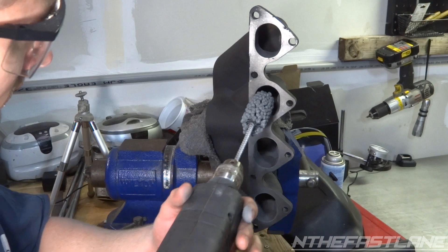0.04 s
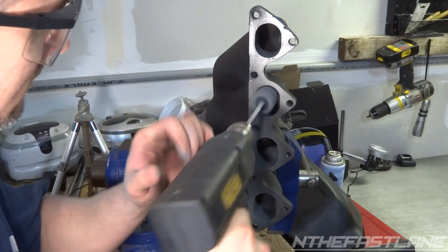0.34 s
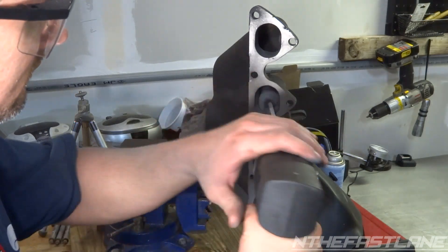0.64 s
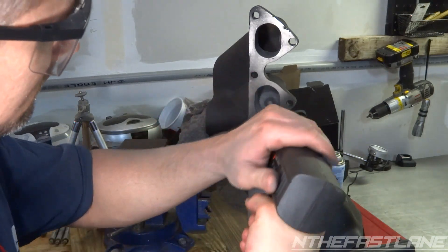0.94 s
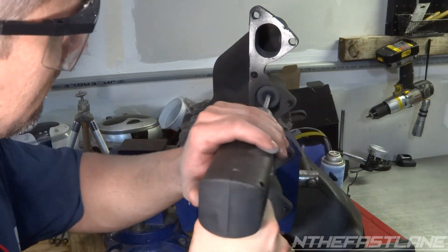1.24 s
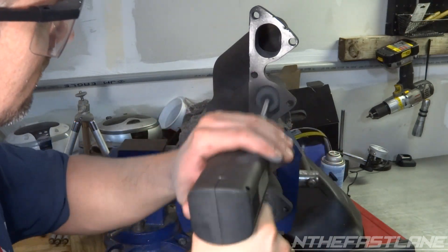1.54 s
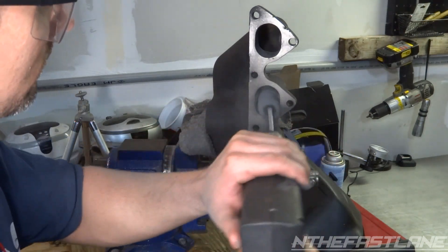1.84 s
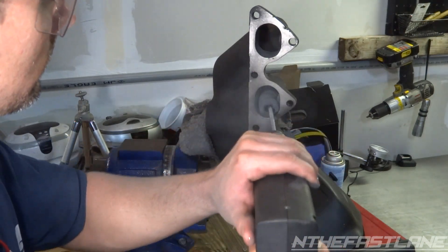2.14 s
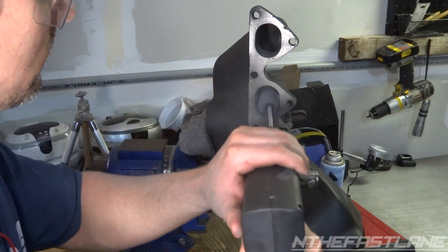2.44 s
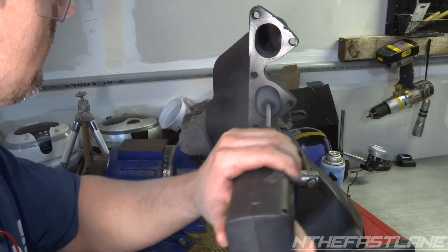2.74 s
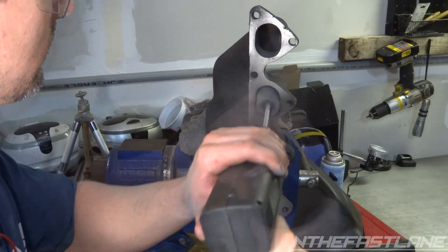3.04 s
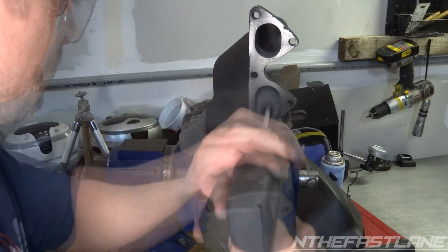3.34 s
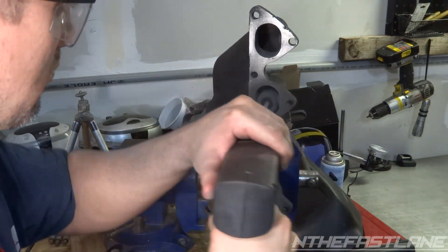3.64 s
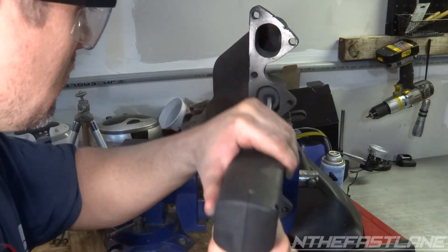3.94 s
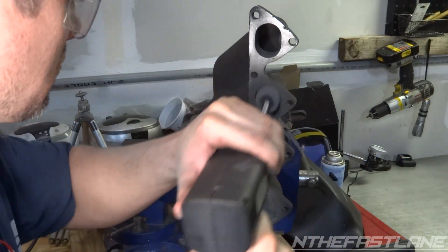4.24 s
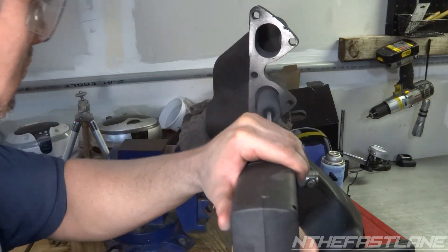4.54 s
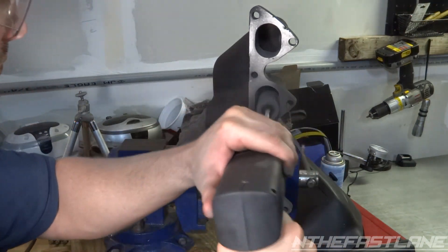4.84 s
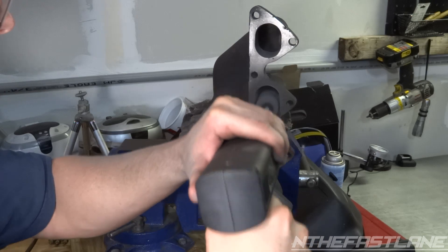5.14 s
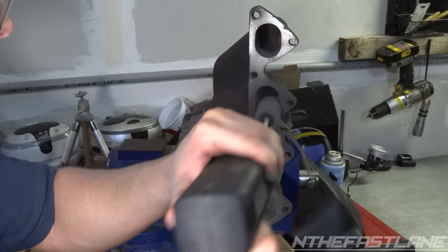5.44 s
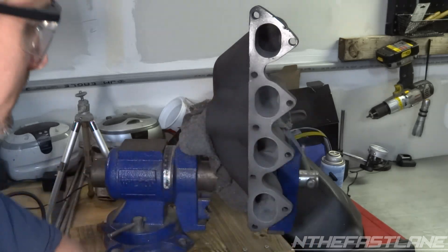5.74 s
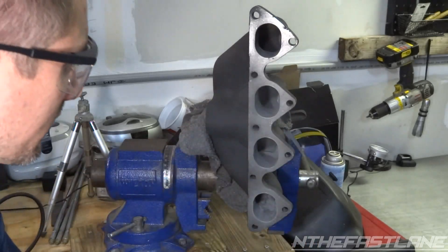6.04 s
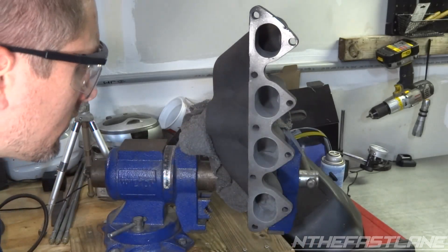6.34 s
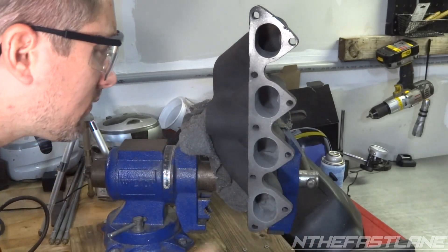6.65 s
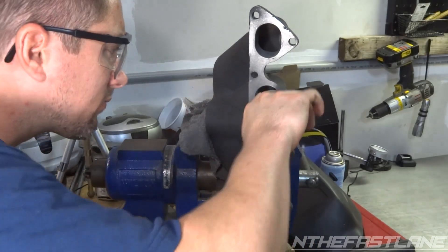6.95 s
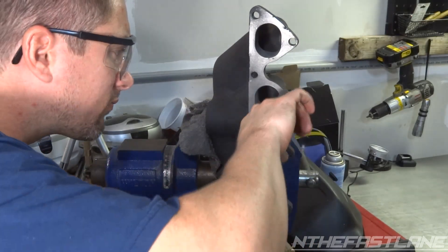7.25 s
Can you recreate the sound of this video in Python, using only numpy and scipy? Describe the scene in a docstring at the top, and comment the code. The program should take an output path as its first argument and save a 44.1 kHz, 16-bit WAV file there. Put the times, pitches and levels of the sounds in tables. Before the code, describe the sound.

Close by in a workshop, a beaded hone ticks lightly against a cast metal part. An electric drill starts with a clack of gears and rises to a high whine, wavering and sagging under load over gritty scrubbing and a fizzing hiss. After about five seconds the hone comes out with a brief whoosh, and the drill rattles as it coasts down.

```python
"""An electric drill spins a beaded abrasive hone in the port of a cast metal manifold, close by in a workshop.
The beads tick on the casting, the trigger is pulled and the gears clack. The armature slots whine,
sagging in pitch under load, over scrubbing beads, growling gears and fizzing brushes.
The hone is drawn out and whirls in the air while the slack drive rattles and coasts down."""
import sys
import numpy as np
from scipy import signal
from scipy.fft import rfft, irfft
from scipy.io import wavfile

SR = 44100
rng = np.random.default_rng(int(sys.argv[2]) if len(sys.argv) > 2 else 0)


def file_out(sig):
    """Save sig as 16-bit WAV at sys.argv[1]."""
    # one column per channel
    cols = np.atleast_2d(sig).T
    # limit, then scale
    lim = np.clip(cols, -1, 1)
    pcm = np.round(lim * 32767).astype(np.int16)
    wavfile.write(sys.argv[1], SR, pcm)


N = 330115
TIME = np.arange(N) / SR
TRIGGER_S, RELEASE_S = 0.248, 5.64
PLANET_ORDER = 18 / 13  # planet gear rate / shaft rate


def gain_of(db):
    """Decibels to amplitude."""
    return 10 ** (np.asarray(db) / 20)


def unit_rms(x):
    """Scale to rms 1."""
    return x / np.sqrt(np.mean(x ** 2) + 1e-20)


def curve(rows):
    """(time, value) rows, interpolated per sample."""
    return np.interp(TIME, *np.transpose(rows))


def bell(x, centre, sigma):
    """Gaussian of height 1."""
    return np.exp(-.5 * ((x - centre) / sigma) ** 2)


def envelope(start_s, attack_s, hold_until_s, db, fall_db, bend):
    """Attack, hold, release; fall_db is lost in the first second of release."""
    attack = np.clip((TIME - start_s) / attack_s, 0, 1)
    return attack * gain_of(db - fall_db * np.maximum(TIME - hold_until_s, 0) ** bend)


def filtered(x, points):
    """Apply (Hz, dB) points; roll off below the first."""
    f, db = np.transpose(points)
    hz = np.fft.rfftfreq(N, 1 / SR)
    response = gain_of(np.interp(np.log(hz + 1), np.log(f), db)) * np.minimum(hz / f[0], 1) ** 2
    return irfft(rfft(x) * response, N)


def coloured(x, points):
    """Filter, then scale to rms 1."""
    return unit_rms(filtered(x, points))


def bandpass(x, low_hz, high_hz):
    """Butterworth band-pass."""
    return signal.sosfilt(signal.butter(2, [low_hz, high_hz], "band", fs=SR, output="sos"), x)


def ring(x, modes):
    """Parallel resonators: (Hz, width Hz, power dB)."""
    out = np.zeros(N)
    for hz, width_hz, db in modes:
        r = np.exp(-np.pi * abs(width_hz) / SR)
        pole = r * np.exp(2j * np.pi * hz / SR)
        out += gain_of(db) * np.sqrt(2 * (1 - r * r)) * signal.lfilter([1], [1, -pole], x).real
    return out


def wander(hz):
    """Low-passed noise, rms 1."""
    f = np.fft.rfftfreq(N, 1 / SR)
    return unit_rms(irfft(rfft(rng.standard_normal(N)) / (1 + (f / hz) ** 4), N))


def smear(hz):
    """Complex wander: blurs amplitude and phase."""
    return wander(hz) + 1j * wander(hz)


def grit(per_s, spread_db, share):
    """Tiny uneven impacts over white noise; share is their part of the power."""
    size = gain_of(spread_db * np.minimum(rng.exponential(1, N), 4)) * rng.choice([-1, 1], N)
    impacts = unit_rms(size * (rng.random(N) < per_s / SR))
    return np.sqrt(share) * impacts + np.sqrt(1 - share) * rng.standard_normal(N)


def running():
    """Near 1 with the trigger held and the hone in the bore."""
    return np.interp(TIME, [TRIGGER_S, .28, 5.52, 5.66, 5.95], [0.01, 0.98, 0.95, 0.73, 0.0021])


def room_rumble(trim_db=4, sway_db=2.0):
    """Rumble of the room and the shaking bench."""
    # (time [s], level [dB])
    levels = [(0.2, -47), (.6, -59), (1.9, -55.5), (2.2, -47.5), (2.45, -50), (2.7, -56.5), (6, -56.5),
              (7.1, -52)]
    # (frequency [Hz], density [dB])
    spectrum = [(20, -20), (40, -12), (56, -9), (75, -7.5), (115, 0.5), (155, 5.5), (220, -3.5), (400, -14),
                (1000, -20), (4000, -19), (16000, -16.5)]
    gain = gain_of(trim_db + curve(levels) + sway_db * wander(hz=6.4))
    return gain * coloured(rng.standard_normal(N), spectrum)


def strikes(hits, modes, crack, snap, snap_s=0.0016):
    """Each contact is a snap and a short scrape that ring the metal."""
    blows = np.zeros(N)
    for onset_s, db, t60_s in hits:
        age_s = np.maximum(TIME - onset_s, 0)
        decay = gain_of(db - 60 * age_s / t60_s) * (TIME >= onset_s)
        blows += decay * (1 + snap * np.exp(-age_s / snap_s))
    scrape = blows * rng.standard_normal(N)
    return ring(scrape, modes) + crack * np.diff(scrape, prepend=0)


def hone_ticks():
    """Hone and chuck strike metal."""
    # (time [s], relative level [dB], t60 [s])
    hits = [(.003, -30.5, .09), (.041, -30, .04), (0.051, -29, .04), (.069, -33, .06), (.108, -34, .04),
            (0.123, -24.5, 0.073), (0.156, -29, 0.048), (0.159, -22.5, 0.15), (0.194, -30, .2),
            (.211, -31, 0.21), (.232, -25, .08), (6.353, -20, 0.095)]
    # (frequency [Hz], width [Hz], level [dB])
    steel_modes = [(3700, 500, -26), (4800, 250, -11), (6800, 620, -11), (8900, 300, -9), (10530, 98, -2),
                   (12000, 3900, 3.5), (13800, 980, -11)]
    return gain_of(-12.5) * strikes(hits, steel_modes, crack=0.16, snap=0.7)


def gear_clacks():
    """Gear teeth take up their slack at the start."""
    # (time [s], relative level [dB], t60 [s])
    hits = [(.2495, -10.5, 0.034), (.259, -18, 0.033), (.268, -14, .025), (.277, -13, 0.12),
            (.292, -18.5, 0.17)]
    # (frequency [Hz], width [Hz], level [dB])
    gearbox_modes = [(1660, 220, -2), (2750, 430, -1.5), (3700, 280, 1), (6800, 320, -1),
                     (10500, 1800, -18)]
    return gain_of(-10) * strikes(hits, gearbox_modes, crack=0.1, snap=0.34)


def shudder(at_s=6.362, sigma_s=.015, lift_db=2):
    """Gain bump: the slack drive shudders once."""
    return gain_of(lift_db * bell(TIME, at_s, sigma_s))


def coast_ringing(uneven_db=2.0):
    """The loose drive keeps hollow and thin resonances sounding as it runs down."""
    # (frequency [Hz], width [Hz], level [dB])
    hollow_modes = [(606, 57, -5.5), (665, 33, 0), (730, 20, -3), (817, 30, -2)]
    thin_modes = [(6280, 58, -5), (6350, 160, -3)]
    hollow = coloured(ring(rng.standard_normal(N), hollow_modes), [(480, 1.5), (900, 0), (3000, -29)])
    chatter = grit(per_s=2300, spread_db=0.5, share=0.28)
    thin = coloured(ring(chatter, thin_modes), [(5000, 6), (7000, -4), (14000, -15)])
    hollow *= envelope(5.7, .17, 5.87, db=-32, fall_db=5.2, bend=2.5)
    thin *= envelope(5.7, .17, 5.87, db=-30.5, fall_db=7.3, bend=1.46)
    return (hollow + thin) * gain_of(uneven_db * wander(hz=30)) * shudder()


def coast_rattle(settle_s=(6.5, 6.63), settle_db=-4, dull_hz=11000):
    """The slack drive rattles, duller and softer once settled."""
    # (frequency [Hz], density [dB])
    spectrum = [(150, -13.5), (500, -5.5), (1750, 3.5), (3200, -3), (4000, 2.5), (4900, -5), (6400, -2.5),
                (7300, -4.5), (7800, -1), (8800, -4.5), (10300, -2.5), (14000, -7.5), (16000, -13)]
    clatter = coloured(grit(per_s=3000, spread_db=2.0, share=0.52), spectrum)
    dull = unit_rms(signal.sosfilt(signal.butter(1, dull_hz, fs=SR, output="sos"), clatter))
    settled = np.interp(TIME, settle_s, [0, 1])
    rattle = (1 - settled) * clatter + settled * gain_of(settle_db) * dull
    return envelope(5.5, .15, 6.08, db=-22.5, fall_db=7.9, bend=0.56) * shudder() * rattle


def bead_whoosh():
    """Out of the bore, the beads beat the air."""
    # (frequency [Hz], density [dB])
    spectrum = [(100, -38), (250, -20), (420, -1), (600, 0.5), (900, 1.5), (1200, 8.5), (1600, 1),
                (2200, 4), (2900, -13), (4200, 0.5), (8000, -3.5), (16000, -29)]
    air = coloured(rng.standard_normal(N), spectrum)
    return envelope(5.47, .13, 5.87, db=-21.5, fall_db=39, bend=0.69) * air


def body_ring(strain_db):
    """Drill body and chuck ring at fixed pitches, louder under strain."""
    # (frequency [Hz], width [Hz], level [dB])
    modes = [(468, 160, -9), (1704, 45, -11), (2980, 250, -13), (5630, 60, -8.5), (7290, 40, 15),
             (8200, 50, -9)]
    shaking = bandpass(ring(rng.standard_normal(N), modes), 400, 9000)
    return gain_of(-37 + 0.55 * strain_db) * running() * unit_rms(shaking)


def port_rasp(strain_db):
    """Beads dragged over the port's edge ring it, far louder under strain."""
    # (frequency [Hz], width [Hz], level [dB])
    modes = [(1100, 260, -10), (1600, 330, -5), (4120, 780, 3), (5950, 700, 0.5)]
    drag = bandpass(grit(per_s=800, spread_db=1.0, share=0.19), 700, 6500)
    return gain_of(-32 + 1.86 * strain_db) * running() * unit_rms(ring(drag, modes))


def honing(turns, strain_db, inrush_s=0.037, uneven_db=1.12, lurch_db=0.69, planet_chop=0.056):
    """Beads scrub and gears growl, harder under strain and at the start; brushes fizz."""
    # (frequency [Hz], density [dB])
    bead_spectrum = [(1500, -34), (2400, 1.5), (2900, -3), (3500, 3.5), (4300, 3.5), (4900, 2), (5500, 4),
                     (6000, 2), (6650, 6.5), (7000, 5), (7450, 2.5), (7850, 0.5), (8650, 4.5), (9800, -2.5),
                     (13000, -2.5)]
    gear_spectrum = [(60, -40), (130, -26), (280, -10), (400, -8), (550, 1.5), (800, 1), (1100, 0.5),
                     (1480, -1), (1720, 3.5), (2000, 2), (2350, 4), (2750, 1.5), (4000, -34), (9000, -50)]
    brush_spectrum = [(5000, -54), (8500, -21), (10000, -2), (11000, -1.5), (11900, 2.5), (12600, -0.5),
                      (13200, -1), (13900, 0), (14900, -22), (15500, -17), (16000, -11)]
    # (time [s], relative level [dB])
    brush_levels = [(.26, -34), (.32, -26), (.6, -25), (.68, -27.5), (2.3, -27.5), (3.5, -27.5),
                    (4.7, -26.5), (5.3, -23.5), (5.5, -24), (5.62, -31.5)]
    inrush = np.exp(-np.maximum(TIME - TRIGGER_S, 0) / inrush_s)
    scrub_db = -21 + 0.41 * strain_db + 4 * inrush + uneven_db * wander(hz=5.8)
    growl_db = -29.5 + 0.34 * strain_db + 11 * inrush + uneven_db * wander(hz=10.5)
    fizz_db = 5 + curve(brush_levels) + 0.92 * wander(hz=14)
    scrub = gain_of(scrub_db) * coloured(grit(per_s=4500, spread_db=3.5, share=0.36), bead_spectrum)
    fizz = gain_of(fizz_db) * coloured(grit(per_s=4000, spread_db=0.0, share=0.3), brush_spectrum)
    growl = gain_of(growl_db) * coloured(grit(per_s=2000, spread_db=3.5, share=0.14), gear_spectrum)
    hiss = (scrub + fizz) * (1 + planet_chop * np.cos(2 * np.pi * PLANET_ORDER * turns))
    return (hiss + growl) * gain_of(lurch_db * wander(hz=40)) * running()


def shaft_speed_hz(kick=0.16, spin_up_s=0.108, coast_s=1.68, friction_hz=70.8):
    """The motor jerks, runs up, holds what the load allows, then coasts against drag and friction."""
    # (time [s], loaded speed [Hz])
    loaded_speed = [(0.77, 415), (0.9, 411.5), (1.01, 417), (1.18, 412), (1.26, 393), (1.38, 384),
                    (1.58, 403), (1.78, 407), (1.93, 396), (2.09, 352), (2.27, 385), (2.41, 384),
                    (2.61, 411), (2.77, 401), (2.95, 417), (3.15, 409.5), (3.27, 415), (3.52, 408),
                    (3.76, 428), (3.92, 405), (4.05, 402), (4.27, 425), (4.42, 402), (4.52, 394),
                    (4.69, 410), (4.89, 411.5), (5.0, 422), (5.28, 429), (5.6, 421)]
    run_up = 1 - (1 - kick) * np.exp(-np.maximum(TIME - TRIGGER_S, 0) / spin_up_s)
    run_down = np.exp(-np.maximum(TIME - RELEASE_S, 0) / coast_s)
    return (curve(loaded_speed) * run_up + friction_hz) * run_down - friction_hz


def housing_db(hz):
    """Lift of a tone crossing a housing resonance."""
    # (frequency [Hz], sigma [Hz], lift [dB])
    resonances = [(390, 6.4, 5.5), (12040, 590, 13.5), (13950, 620, 17)]
    return sum(db * bell(hz, centre_hz, sigma_hz) for centre_hz, sigma_hz, db in resonances)


def spin_up_surge(turns, roughness=0.32):
    """Overtones of the slot whine swell and fade as the motor gathers speed."""
    # (multiple of shaft rate)
    orders = [12, 18, 24]
    # per order: (time [s], sigma [s], level [dB])
    swells = [(0.361, 0.027, -20.5), (.46, .04, -28), (0.363, .032, -22)]
    tones = sum(gain_of(db) * bell(TIME, at_s, sigma_s) * np.sin(2 * np.pi * order * turns)
                for order, (at_s, sigma_s, db) in zip(orders, swells))
    return tones * np.sqrt(2) * unit_rms(1 + roughness * wander(hz=160)) * running()


def shaft_tone(turns, order, sway):
    """Tone at a multiple of the shaft rate, modulated by the complex sway."""
    return np.sqrt(2) * (sway * np.exp(2j * np.pi * order * turns)).real


def gear_tones(turns, shaft_hz, strain_db):
    """Weak shaft and gear-mesh tones, frayed by worn teeth."""
    # (multiple of shaft rate)
    orders = [1, 1.385, 2.77, 4.155, 4.615, 6.31, 7, 7.385, 10, 10.615, 11, 13, 13.385, 18, 24]
    # per order: (base level [dB])
    levels_db = [-55.5, -55, -52, -42.5, -44.5, -48, -47, -49, -43, -47, -43, -42, -39, -42.5, -41.5]
    out = np.zeros(N)
    for order, db in zip(orders, levels_db):
        fray = unit_rms(1 + wander(hz=24.4) + 2j * wander(hz=40.5))
        out += gain_of(db + strain_db + housing_db(order * shaft_hz)) * shaft_tone(turns, order, fray)
    return out * running()


def slot_whine(turns, shaft_hz, flutter_db=2.5, grip_db=1.72, sixth_db=-45, fall_db_per_s=10):
    """Armature slot tones flutter with brush bounce and drift with the grip; planet gears add sidebands."""
    # (multiple of shaft rate)
    orders = [6, 12, 30, 36]
    # slot harmonics 1, 2 and 5: (time [s], base level [dB])
    first = [(.25, -45), (.4, -24.5), (.75, -33), (1.3, -27), (1.62, -33), (1.8, -21), (2.85, -24),
             (3.02, -18), (3.14, -28), (3.3, -20), (3.45, -27.5), (4.0, -27.5), (4.85, -33.5), (5.6, -36)]
    second = [(.45, -38), (.68, -22.5), (1.2, -23), (1.6, -30.5), (3.3, -32.5), (4.02, -26), (4.2, -31),
              (4.7, -32), (5.35, -24.5), (5.65, -34), (6.25, -36), (6.6, -28.5), (7.0, -38)]
    fifth = [(.6, -46), (1.1, -44.5), (1.45, -38.5), (2.4, -44), (3.0, -36.5), (3.5, -36), (3.9, -52),
             (4.4, -36), (4.9, -41), (5.5, -48)]
    # per order: (change when slack [dB])
    slack_changes = [-15, 4, -7, -12]
    # per order: (lower [dB], upper [dB])
    sidebands = [(-35, -21), (-17, -30), (-9.5, -9.5), (-6, -16)]
    levels = [curve(first), curve(second), curve(fifth), sixth_db]
    out, driven = np.zeros(N), running()
    planet = np.exp(2j * np.pi * PLANET_ORDER * turns)
    fade_db = fall_db_per_s * np.maximum(TIME - RELEASE_S, 0)
    for order, base_db, slack_db, (lower_db, upper_db) in zip(orders, levels, slack_changes, sidebands):
        db = base_db + driven * housing_db(order * shaft_hz) + (1 - driven) * slack_db - fade_db
        db += grip_db * wander(hz=8)
        flutter = unit_rms(gain_of(flutter_db * wander(hz=34.5))) + 0.33 * smear(hz=70)
        skirt = 0.093 * order / 6 * smear(hz=450)
        whirr = 0.41 * smear(hz=130)  # unloaded, the tone breaks up
        sway = driven * (flutter + skirt) + (1 - driven) * whirr
        shake = (gain_of(lower_db) / planet + gain_of(upper_db) * planet) * (1 + .5 * wander(hz=12))
        out += gain_of(db) * shaft_tone(turns, order, sway * (1 + shake))
    return out


def workshop(x, wet_db=-13, side_db=-21.0, t60_s=0.29, echoes_per_s=2000):
    """Short wall reflections, narrow stereo."""
    # (frequency [Hz], side gain [dB])
    width = [(20, -1), (100, -7), (400, -5.5), (700, 3.5), (1400, 0), (3000, -0.5), (5500, 3.5),
             (9000, -0.5), (13000, -10.5)]
    t = np.arange(SR // 3) / SR
    taps = rng.standard_normal((2, len(t))) * (rng.random((2, len(t))) < echoes_per_s / SR)
    taps *= (t > .003) * gain_of(-60 * t / t60_s)
    tail, side = (signal.fftconvolve(x, h / np.linalg.norm(h))[:N] for h in taps)
    mid = x + gain_of(wet_db) * tail
    side = gain_of(side_db) * filtered(side, width)
    return np.array([mid + side, mid - side]) * gain_of([[-.1], [.1]])


def scene(jitter=0.00123, slack_jitter=0.0061):
    """One shaft drives the whine and gear tones; its speed trembles, more so when slack."""
    # hone bearing on the bore: (time [s], strain [dB])
    strain = [(.3, -1), (.6, 0.5), (1.05, 0), (1.4, 1), (1.65, -3), (2.3, -1), (2.55, 2), (2.68, -6.5),
              (2.85, -1), (3.02, -4.5), (3.2, -0.5), (3.55, 2.5), (3.78, 4.5), (3.96, 1.5), (4.19, 4),
              (4.44, -2), (4.68, 2), (5.05, 1.5), (5.55, 2.5)]
    shaft_hz, strain_db = shaft_speed_hz(), curve(strain)
    tremble = jitter * wander(hz=29.5) + slack_jitter * (1 - running()) * wander(hz=118)
    turns = np.cumsum(shaft_hz * (1 + tremble)) / SR
    fade_in = np.sqrt(np.clip((TIME - .25) / .2, 0, 1))
    motor = fade_in * (slot_whine(turns, shaft_hz) + gear_tones(turns, shaft_hz, strain_db))
    drill = motor + spin_up_surge(turns) + body_ring(strain_db)
    coasting = coast_rattle() + bead_whoosh() + coast_ringing()
    hone = honing(turns, strain_db) + port_rasp(strain_db)
    return workshop(drill + coasting + hone + hone_ticks() + gear_clacks() + room_rumble())


def record(dry, edge_hz=15850):
    """Steep low-pass band limit."""
    lowpass = signal.firwin(401, edge_hz, window=("kaiser", 9), fs=SR)
    return signal.oaconvolve(dry, lowpass[None], "same", axes=1)


dry = scene()
out = record(dry)
file_out(out)
```